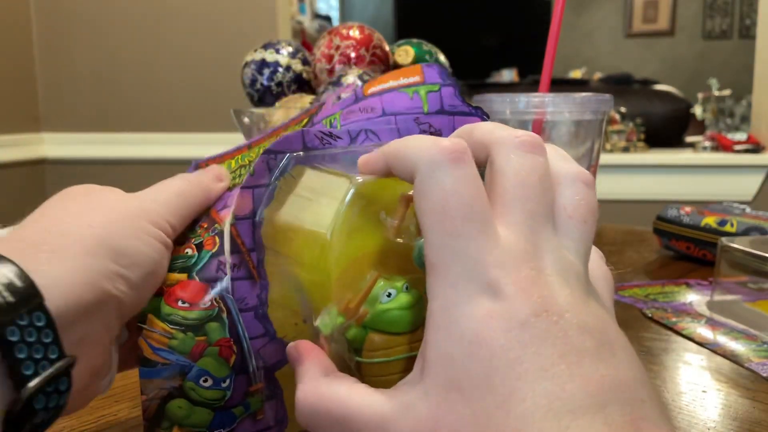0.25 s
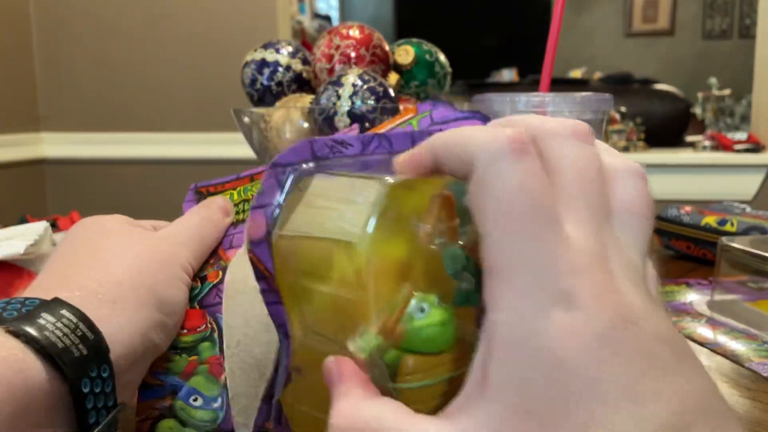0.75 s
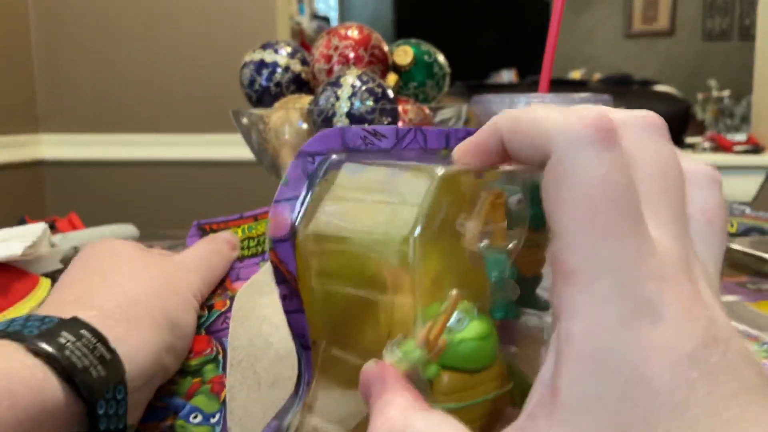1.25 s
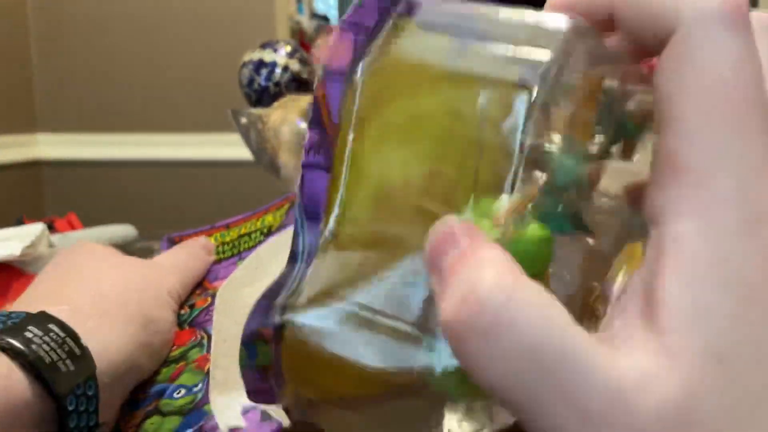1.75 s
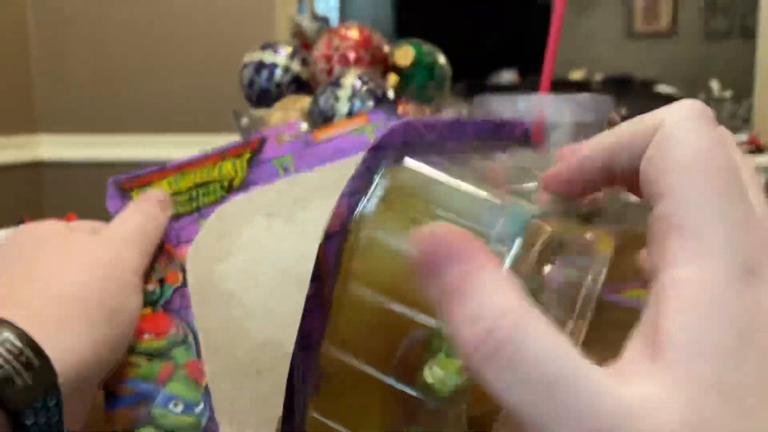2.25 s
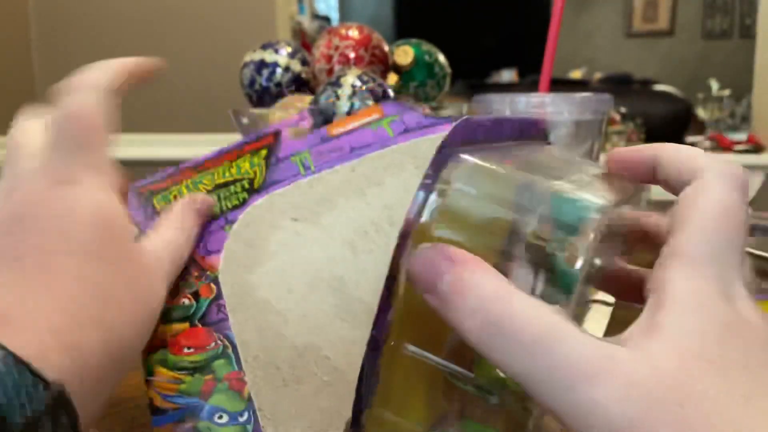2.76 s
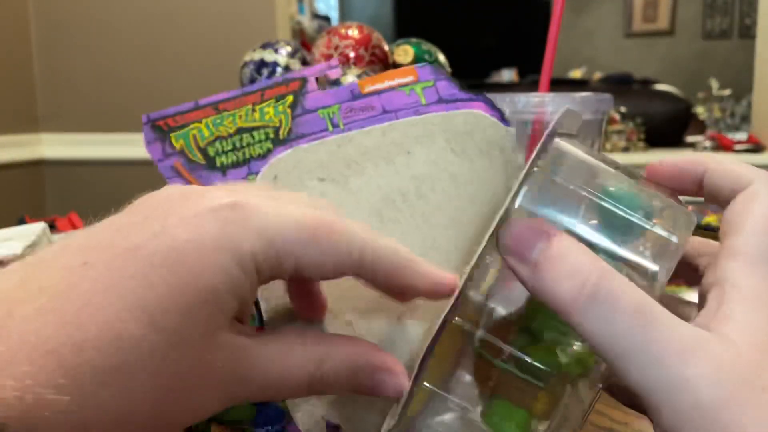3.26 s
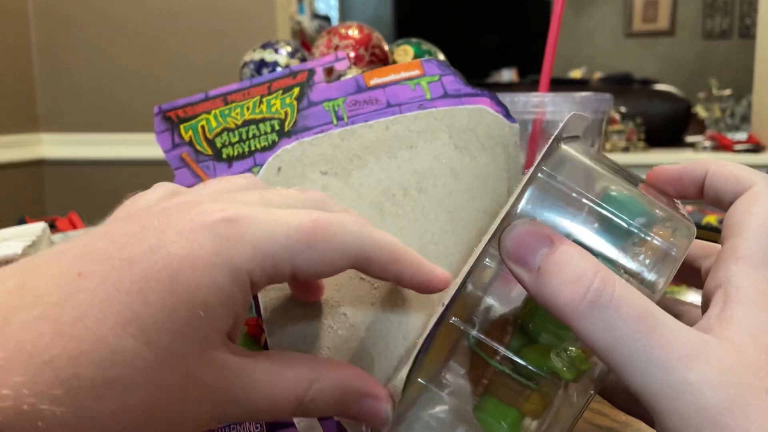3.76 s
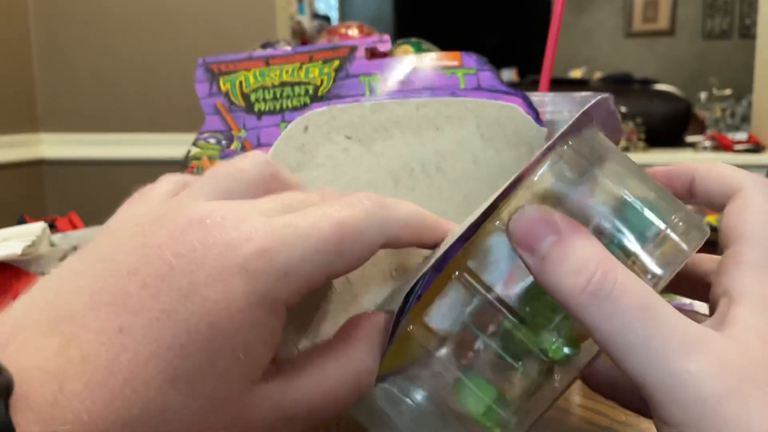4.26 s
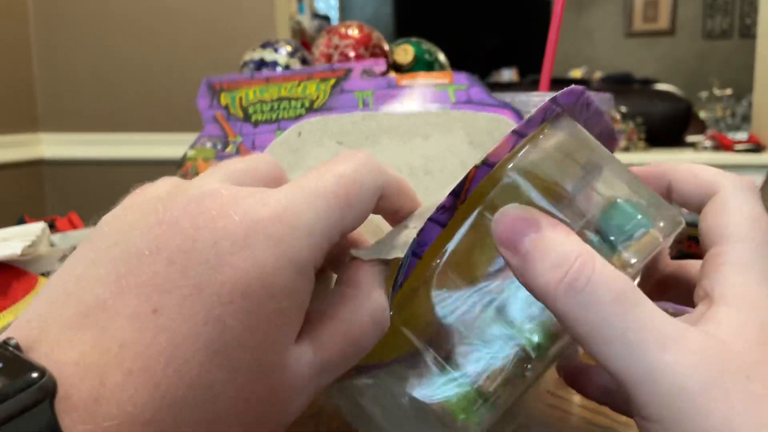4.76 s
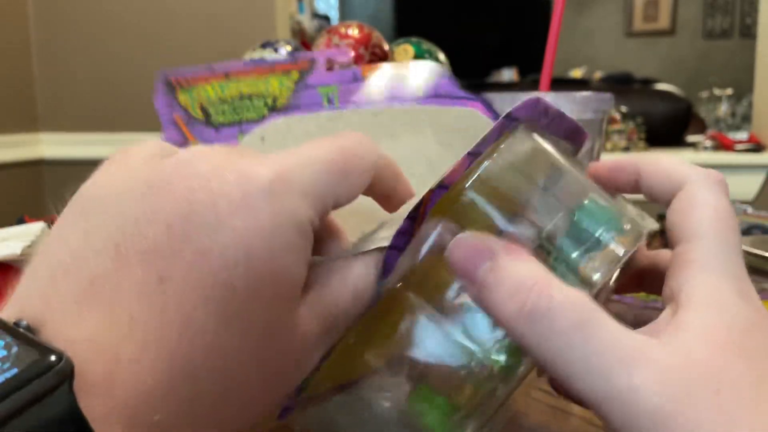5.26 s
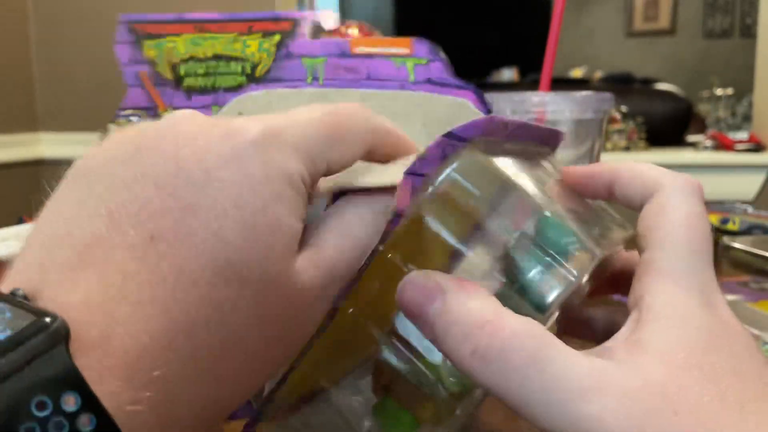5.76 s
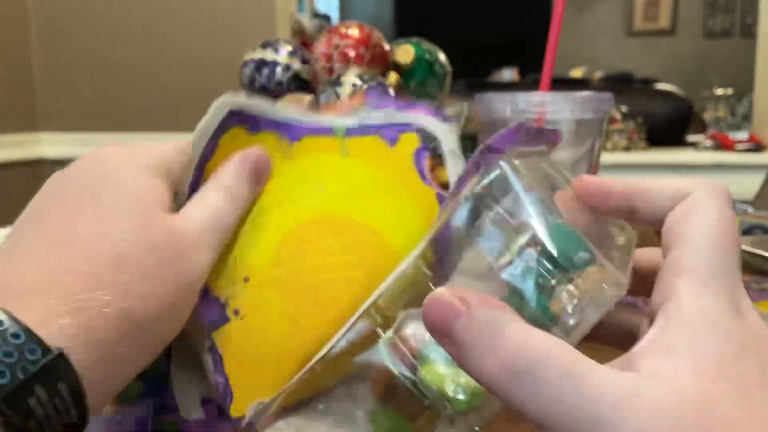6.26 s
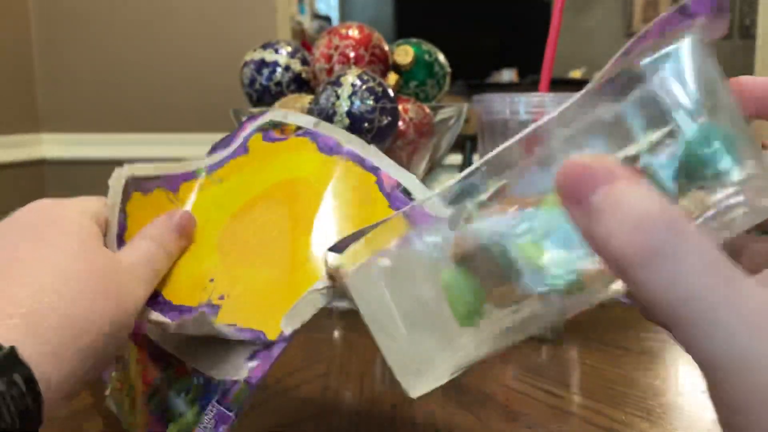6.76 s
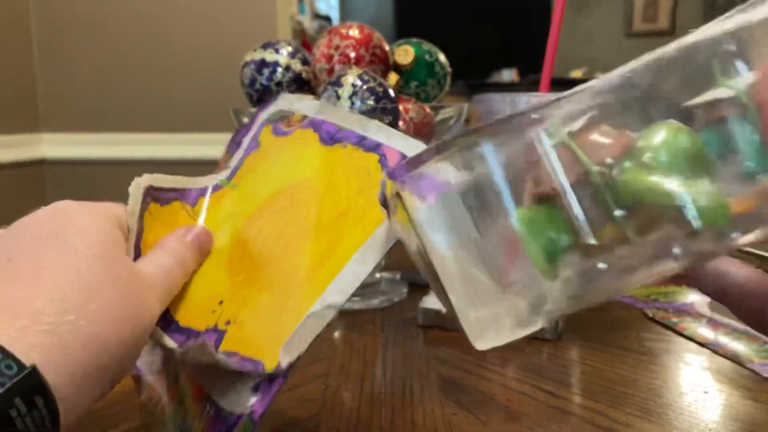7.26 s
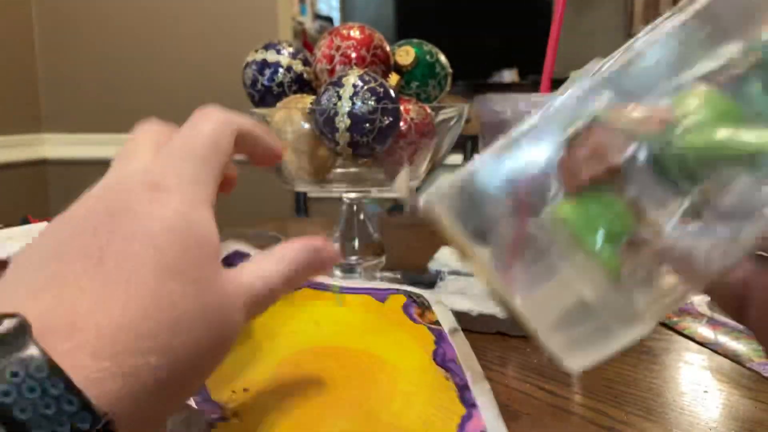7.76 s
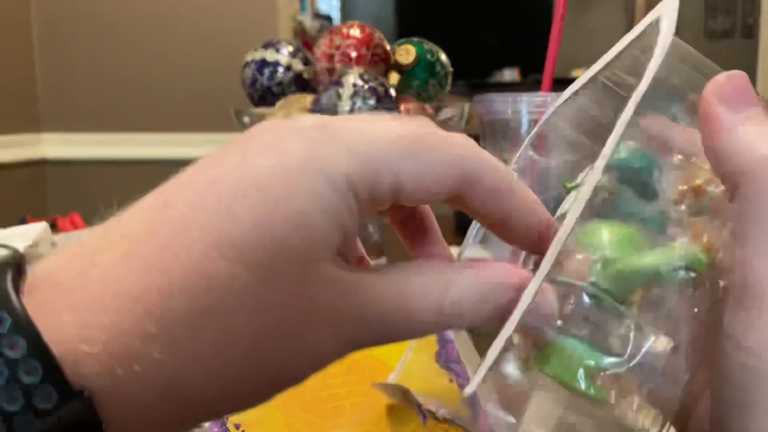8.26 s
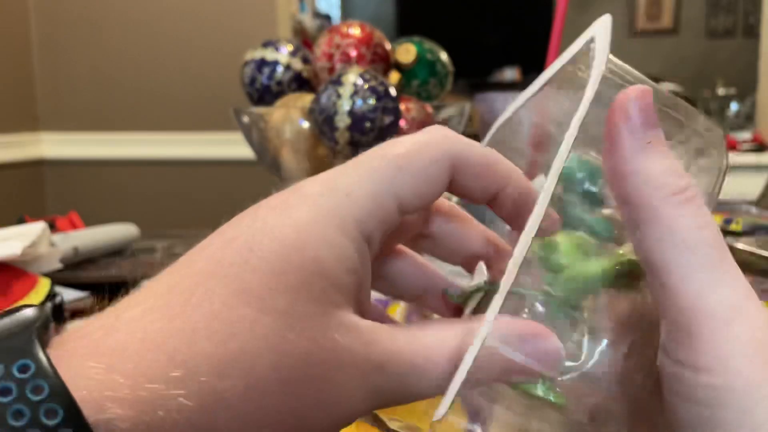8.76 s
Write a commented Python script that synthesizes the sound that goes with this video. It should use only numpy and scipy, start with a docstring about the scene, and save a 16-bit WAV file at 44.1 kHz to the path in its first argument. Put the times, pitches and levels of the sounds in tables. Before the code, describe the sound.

Close-up toy package opening: hollow plastic creases pop sharply, rustle and rip from their cardboard, then nearly fall silent before light crackles.

```python
"""Creases snap in a clear plastic shell as hands peel it off its card backing and bend it, close to a phone.
Each snap rings sine modes of the hollow shell, with a noise thud below and a crack and tick above.
Flexes raise bursts of rustle, grainy noise through ringing modes, over the steady tearing of glue and paper.
The card thuds, a low tone hums once, and a quiet room adds faint air and a short tail.
Layer levels are set ahead of the room, the stereo balance and the phone's own gain."""
import sys
import numpy as np
from scipy import signal
from scipy.fft import rfft, irfft, next_fast_len
from scipy.io import wavfile

SR = 44100
rng = np.random.default_rng(int(sys.argv[2]) if len(sys.argv) > 2 else 0)


def dump(signal):
    """Clip the signal to [-1, 1] and save it as 16-bit WAV at the path in sys.argv[1]."""
    limited = np.clip(np.atleast_2d(signal).T, -1, 1)
    pcm = np.round(limited * 32767).astype(np.int16)
    wavfile.write(sys.argv[1], SR, pcm)


N = 397782
T = np.arange(N) / SR
SPLIT_HZ = 1300  # shell modes below sound hollow, those above sound bright


def undb(db):
    """Decibels to amplitude."""
    return 10 ** (np.asarray(db) / 20)


def unit(x):
    """Scale to rms 1."""
    return x / np.sqrt(np.mean(x ** 2))


def across(table, size, column=1):
    """A table column read on a log-frequency axis at every bin."""
    rows = np.array(table)
    bins = np.log(np.fft.rfftfreq(size, 1 / SR) + 1)
    return np.interp(bins, np.log(rows[:, 0]), rows[:, column])


def colour(x, table):
    """Filter the last axis by a curve of f/Hz, level/dB points."""
    size = next_fast_len(x.shape[-1])
    return irfft(rfft(x, size) * undb(across(table, size)), size)[..., :x.shape[-1]]


def ring(x, hz, t60):
    """One damped mode driven by x, as a two-pole resonator."""
    p = np.exp(-np.log(1000) / (t60 * SR))
    w = 2 * np.pi * hz / SR
    return signal.lfilter([np.sin(w)], [1, -2 * p * np.cos(w), p * p], x)


# stereo image of the two channels by frequency: [f/Hz, likeness 0-1, left minus right level/dB]
STEREO_IMAGE = [(60, 0.91, -2.5), (298, 0.94, -0.8), (700, 0.8, -4), (1290, 0.6, -1), (2797, 0.5, -3),
                (4710, 0.48, -5), (5800, 0.2, -4), (7150, 1, -1.5), (14000, 1, 1)]
# phase turn of the right channel by frequency: [f/Hz, turn/half turns]
RIGHT_TURN = [(0, 0), (600, .13), (1600, .2), (5600, .1), (7000, -.92), (8700, -1.05), (10600, -1.95),
              (12200, -2.05), (13900, -2.96), (15500, -3.05), (17000, -3.2)]
# stereo balance over time, on top of the image's own: [t/s, left minus right level/dB]
BALANCE = [(0, 1), (4.5, -0.45), (6, 0.6), (9.02, -1)]


def stereo(shared, other):
    """Shared sound enters both channels alike; the other part, added with opposite sign, widens the image."""
    size = next_fast_len(N)
    like = np.clip(across(STEREO_IMAGE, size), 0, 1)
    shared = rfft(shared, size) * np.sqrt((1 + like) / 2)
    other = rfft(other, size) * np.sqrt((1 - like) / 2)
    pan = undb(across(STEREO_IMAGE, size, column=2) / 2)
    half_turns = np.interp(np.fft.rfftfreq(size, 1 / SR), *np.transpose(RIGHT_TURN))
    left = (shared + other) * pan
    right = (shared - other) * np.exp(1j * np.pi * half_turns) / pan
    channels = irfft(np.array([left, right]), size)[:, :N]
    balance_db = np.interp(T, *np.transpose(BALANCE))
    return channels * undb(balance_db * np.array([[.5], [-.5]]))


# colour of the quiet air, heavy in the bass: [f/Hz, level/dB]
AIR_COLOUR = [(30, -1.5), (90, -1), (200, -12.5), (600, -21.5), (3000, -34.5), (16000, -48)]
AIR_DB = -62


def air():
    """Steady noise of the quiet room, weighted to the bass."""
    return undb(AIR_DB) * unit(colour(rng.standard_normal(N), AIR_COLOUR))


# colour of the room tail, thin in the bass: [f/Hz, level/dB]
TAIL_COLOUR = [(100, -21), (400, 0), (16000, -3.5)]
ROOM_T60_S, ROOM_DB = 0.16, -14


def room(x):
    """Table and walls add a short diffuse tail, as decaying noise convolved with the sound."""
    t = np.arange(SR // 2) / SR
    tail = colour(rng.standard_normal(len(t)), TAIL_COLOUR)
    tail = tail * np.exp(-np.log(1000) * t / ROOM_T60_S) * (t > .003)
    tail = tail / np.sqrt(np.sum(tail ** 2))
    return x + undb(ROOM_DB) * signal.fftconvolve(x, tail)[:N]


# a low hum, perhaps the card slipping under a finger: [t/s, f/Hz, level/dB rms]
HUM_GLIDE = [(3.28, 130, -54), (3.456, 142, -43.5), (3.64, 140.5, -53.5)]


def hum():
    """A short, low, near-pure tone that glides slightly in pitch."""
    s, hz, db = np.transpose(HUM_GLIDE)
    level = np.sqrt(2) * undb(np.interp(T, s, db, -120, -120))
    return level * np.sin(2 * np.pi * np.cumsum(np.interp(T, s, hz)) / SR)


# gain on the deepest rumble of the card: [t/s, level/dB]
RUMBLE_GAIN = [(0, -14), (1.3, -7), (2.75, 6.5), (3.2, -13), (4.3, -5), (6.8, -1.5), (7.3, 4.5), (9.02, 6)]


def rumble(x):
    """The deepest part of the card's thud comes and goes, by a moving gain on the lowest band."""
    lowpass = signal.butter(2, 105., fs=SR, output="sos")
    deep = signal.sosfiltfilt(lowpass, x)
    return x + deep * (undb(np.interp(T, *np.transpose(RUMBLE_GAIN))) - 1)


# dull colour of the card's thud: [f/Hz, level/dB]
THUD_COLOUR = [(30, -11), (70, 4.5), (150, 6), (220, -1), (350, -44)]


def card_thud(noise):
    """The card's body answers a knock with low noise."""
    return colour(noise, THUD_COLOUR)


# airy colour of tearing glue and paper, and of the snaps' ticks: [f/Hz, level/dB]
TEARING_COLOUR = [(1800, -3.5), (4800, 1), (7400, 6.5), (8800, 5.5), (11000, 2.5), (13000, -4),
                  (15200, 6.5), (16500, -17)]


def tearing(noise):
    """Parting fibres rasp as treble noise."""
    return colour(noise, TEARING_COLOUR)


# colour of the crackle when it is fine: [f/Hz, level/dB]
FINE_CRACKLE = [(800, -21), (1300, 1), (2000, -2), (3000, -0.5), (4500, -5.5), (6000, -8.5), (7000, -30.5)]
# colour of the crackle when it is coarse: [f/Hz, level/dB]
COARSE_CRACKLE = [(800, -13), (1300, 2.5), (2500, -16), (4500, -26.5), (7000, -51.5)]


def crackling(noise, treble_db):
    """The louder the treble against the crackle, the brighter the crackle itself."""
    bright = np.clip(2.0 + treble_db / 9.94, 0, 1)
    fine = np.sqrt(bright) * unit(colour(noise, FINE_CRACKLE))
    coarse = np.sqrt(1 - bright) * unit(colour(noise, COARSE_CRACKLE))
    return fine + coarse


def grains(per_s, spread_db, tail_s, smooth):
    """Envelope of many small uneven slips, each swelling and dying quickly, over an even rub; rms 1."""
    sizes = undb(spread_db * np.minimum(rng.exponential(size=N), 4))
    kicks = (rng.random(N) < per_s / SR) * sizes
    p = np.exp(-1 / (tail_s * SR))
    slips = unit(signal.lfilter([1], [1, -2 * p, p * p], kicks))
    return unit(smooth + slips)


def patchy(per_s, spread_db):
    """A randomly wandering gain that makes one mode's ringing uneven."""
    steps = np.clip(rng.standard_normal(int(N / SR * per_s) + 2), -3, 1.4)
    return undb(spread_db * np.interp(T * per_s, np.arange(len(steps)), steps))


# steady pull of the hands: [t/s, shell rustle level/dB, card thud level/dB, crackle level/dB,
# fine tearing level/dB]
STEADY_PULL = [(0, -44.5, -51, -50.5, -51.5), (0.35, -38.5, -60, -45, -41.5), (1.25, -46, -48, -65, -46.5),
               (1.7, -41.5, -45, -46, -44), (1.85, -49.5, -46, -58.5, -59.5),
               (2.4, -51.5, -49, -70.5, -72.5), (2.95, -53, -63, -71.5, -71.5),
               (3.549, -62, -51.5, -73.5, -88), (4.15, -51.5, -75, -60, -61.5),
               (4.93, -61, -67, -72, -88.5), (5.33, -55.5, -65, -59.5, -51),
               (6.55, -59.5, -59.5, -54, -70.5), (7.2, -61.5, -66, -64, -63.5), (7.5, -54, -62, -62, -67),
               (7.8, -80, -74, -64.5, -69.5), (8.0, -86, -71, -85, -97), (8.5, -77, -75, -79, -80),
               (9.02, -50, -65, -51.5, -57.5)]
# flexes of the shell: [peak t/s, shell rustle level/dB, card thud level/dB, crackle level/dB,
# fine tearing level/dB, swell t/s, fade t/s]; both times are held within 0.008 to 1 s
SHELL_FLEXES = [(0.159, -37, -61, -36.5, -37.5, 0.02, 0.2), (0.244, -37.5, -54, -38.5, -38.5, 0.08, 0.2),
                (.45, -35.5, -52, -45.5, -40, .008, 0.5), (.716, -23, -37.5, -32.5, -31.5, 0.1, 0.14),
                (.9, -38.5, -54.5, -47.5, -43.5, 0.1, 0.14), (1.109, -35, -44.5, -41, -34.5, 0.2, 0.09),
                (1.327, -51.5, -60, -54, -39.5, .08, -0.27), (1.438, -33.5, -65, -36.5, -31, 0.06, 0.05),
                (1.638, -34, -57, -38.5, -42, 0.54, 0.04), (1.732, -28, -40, -42, -31.5, 0.03, 0),
                (1.956, -40, -29.5, -58, -62.5, 0.08, 0.16), (2.003, -31, -30.5, -40.5, -56.5, 0.05, 0.14),
                (2.161, -31, -31, -49, -58, .01, .2), (2.538, -39, -41, -52, -63, .009, 0.2),
                (2.693, -38, -57, -45.5, -55, 0.16, 0.13), (2.786, -39, -36.5, -69, -64, .008, .008),
                (2.824, -44, -61, -43, -58.5, 0.01, 0.12), (3.02, -37, -38, -55, -60, 0.04, 0.06),
                (3.069, -32.5, -61, -46.5, -50, 0.1, 0.24), (3.344, -41, -43.5, -57.5, -62, -0.47, 0.12),
                (3.476, -37, -58, -46, -53, 0.06, 0.05), (3.733, -39, -48, -54, -64, .009, 0.25),
                (3.905, -28.5, -50, -47.5, -51.5, 0.12, 0.12),
                (4.051, -39.5, -45.5, -49.5, -50, 0.06, 0.08), (4.225, -49, -66, -49.5, -58, 0.1, -0.1),
                (4.292, -43.5, -51, -57.5, -46, 0.07, -0.85), (4.452, -39.5, -44, -52.5, -50, 0.24, 0.24),
                (4.6, -45, -38, -61, -53, -0.1, -0.34), (4.695, -34, -50, -39, -42, 0.15, 0.14),
                (4.816, -34, -46, -46.5, -47, .008, 0.12), (5.068, -37.5, -45, -44.5, -41, 0.15, 0.1),
                (5.251, -32.5, -40.5, -45.5, -49, 0.04, 0.07), (5.439, -28, -60, -36, -34.5, 0.09, 0.08),
                (5.572, -41, -45.5, -43, -61, 0.4, 0.07), (5.65, -39, -50, -52, -56, 0.2, -0.1),
                (5.76, -32.5, -46.5, -47.5, -47, 0.07, 0.4), (5.89, -39, -44, -47, -46, 0.14, 1),
                (5.988, -18.5, -34, -29, -30, 0.04, 0.14), (6.158, -23, -33, -28.5, -31.5, -0.04, 0.1),
                (6.247, -29, -45, -32, -34.5, -0.02, 0.11), (6.42, -30.5, -37, -34, -39, 0.19, 0.14),
                (6.626, -41.5, -62, -37.5, -35.5, -0.01, 0.1),
                (6.681, -37, -46.5, -36.5, -34.5, 0.09, .008), (6.78, -36, -49, -32, -41, 0.05, 0.21),
                (6.95, -31.5, -49, -24, -34, 0.02, 0.107), (7.137, -47, -56.5, -49.5, -53, 1, 0.6),
                (7.333, -21.5, -29, -30.5, -42, 0.0248, 0.0944), (7.544, -58, -55, -48, -59.5, 0.2, 0.24),
                (7.634, -43.5, -46, -64.5, -62.5, -0.14, 0.04), (7.932, -62, -65, -76, -79.5, 0.2, -0.2),
                (8.06, -64.5, -69.5, -59.5, -64, -0.04, 0.5), (8.2, -63, -65, -59.5, -61, 0.06, 0.2),
                (8.371, -63, -63, -52.5, -57.5, -0.03, 0.1), (8.545, -57, -56, -56.5, -66, -0.2, 0.3),
                (8.679, -52.5, -62, -56.5, -64, -0.1, 3.5), (8.81, -55, -49, -61, -60, -0.1, -0.1),
                (8.881, -42, -74.5, -35, -36, 0.0444, 0.04)]
FADE_DB = 20  # change over one swell or fade time


def handling(size=4000):
    """Levels in dB of the four rustle layers: steady pull plus every flex, summed as power."""
    t = np.linspace(0, N / SR, size)
    s, *columns = np.transpose(STEADY_PULL)
    pull = undb([np.interp(t, s, c) for c in columns])
    rows = np.array(SHELL_FLEXES)
    late = t - rows[:, :1]
    swell_s, fade_s = np.clip(rows[:, -2:], .008, 1).T[:, :, None]
    shape = undb(FADE_DB * np.minimum(late / swell_s, -late / fade_s))
    power = pull ** 2 + undb(rows[:, 1:-2].T) ** 2 @ shape ** 2
    return [np.interp(T, t, 10 * np.log10(p)) for p in power]


# modes of the shell, for rustle and snaps alike: [f/Hz, relative level/dB]
SHELL_MODES = [(250, -1), (330, -3.5), (400, 1), (500, -3.5), (620, 0), (720, 2.5), (810, -1), (900, 2.5),
               (1030, -0.5), (1180, -19), (1450, -18), (1750, -6.5), (2050, -6.5), (2430, -17), (2970, -15),
               (3600, -20), (4300, -17), (4900, -16), (5800, -19.5)]


def rustle(slow, quick):
    """Small slips shake the shell's modes and the card; tearing fibres rasp above them."""
    shell_db, thud_db, crackle_db, tearing_db = handling()
    noise = rng.standard_normal((4, N))
    rasp = (quick + .5 * slow) * noise[2]
    hollow = bright = 0
    for hz, db in SHELL_MODES:
        if hz < SPLIT_HZ:
            tilt_db = -0.63 * np.log2(hz / 500)
            hollow = hollow + undb(db + tilt_db) * ring(slow * patchy(30., 4.8) * noise[0], hz, 0.022)
        else:
            bright = bright + undb(db) * ring(rasp * patchy(22., 26.0), hz, 0.13)
    crackle = unit(crackling(rasp, tearing_db - crackle_db) + 0.55 * unit(bright))
    thud = unit(card_thud(slow * noise[1]))
    fibres = unit(tearing((quick + 0.4 * slow) * noise[3]))
    return (undb(shell_db) * unit(hollow) + undb(thud_db) * thud
            + undb(crackle_db) * crackle + undb(tearing_db) * fibres)


# creases snapping, each layer at its peak level: [peak t/s, shell level/dB, shell f/Hz, thud level/dB,
# crack level/dB, crack f/Hz, tick level/dB, softness/ms (sets ramp and ring)]
CREASE_SNAPS = [(0.083, -27, 416, -62, -30.5, 1840, -41, 2.4),
                (0.108, -36, 710, -56, -25, 2500, -34.5, 0.67),
                (0.152, -23.5, 570, -52, -24, 1970, -43, 1.4), (.239, -6.5, 470, -48, -10, 2540, -36, 1.8),
                (0.44, -15, 587, -31, -19.5, 1970, -21, 0.59),
                (0.455, -16, 904, -35.5, -18, 1965, -38.5, 1.8),
                (0.505, -11.5, 860, -37, -14, 1970, -25.5, 1.2),
                (0.654, -23.5, 392, -44, -35, 5340, -40.5, 2.4),
                (0.701, -16, 755, -34, -17, 1440, -25, 2.4), (.718, -3, 718, -13.5, -5.5, 1467, -17.5, 3.3),
                (.787, -29, 700, -48, -26.5, 2060, -38, 3), (.849, -24, 786, -54, -27, 1370, -37.5, 3.8),
                (1.004, -30, 750, -44, -15.5, 2050, -30.5, 0.91),
                (1.016, -30, 720, -51.5, -27, 5300, -23, 0.49),
                (1.223, -32, 980, -66, -26.5, 2020, -53, 0.82), (1.425, -25, 694, -55, -39, 3030, -24.5, 2),
                (1.45, -7, 564, -51, -21, 1340, -27, 1.4), (1.585, -13, 790, -50, -14, 3400, -31, 1.9),
                (1.656, -23.5, 800, -46, -21, 1600, -29.5, 1.3), (1.82, -25, 611, -34, -54, 1395, -55, 5.3),
                (1.891, -34.5, 717, -41, -50.5, 4900, -22.5, 1.2),
                (1.935, -32.5, 672, -40, -35, 1510, -39.5, 2.8), (1.997, 3, 563, -5, -12, 2976, -23, 4.2),
                (2.06, -28, 700, -35, -28, 1374, -28.5, 1.9), (2.159, -6, 394, -21.5, -23, 2740, -26, 3.2),
                (2.241, -23.5, 460, -43, -34, 1300, -42, 0.89), (2.312, -29, 600, -35, -60, 1530, -71, 11),
                (2.539, -23.5, 350, -31, -42, 1400, -49, 4),
                (2.548, -27.5, 340, -27.5, -23, 2840, -38.5, 1.9),
                (2.648, -29, 565, -51, -43, 1370, -62, 2.5),
                (2.706, -21.5, 536, -32, -28.5, 1890, -30, 4.8),
                (2.816, -29.5, 1150, -47, -30.5, 1790, -45, 4.9),
                (2.833, -23.5, 610, -56, -25, 1770, -36, 4.6), (2.85, -27, 1170, -57, -32, 1850, -49, 5.2),
                (2.895, -20.5, 560, -40, -30, 1950, -43.5, 3.5),
                (3.015, -14, 645, -37, -39, 1360, -40, 0.9), (3.064, -20.5, 740, -52, -29.5, 1390, -46, 13),
                (3.097, -27.5, 815, -52.5, -36, 2750, -48, 4.1),
                (3.124, -32, 784, -50, -48, 1700, -44, 0.85), (3.179, -27, 795, -61, -44, 1700, -51, 1.6),
                (3.45, -23, 612, -48, -48, 3200, -44, 5.9), (3.495, -27.5, 390, -60, -40.5, 1500, -45, 4.6),
                (3.619, -28, 730, -48, -41.5, 1320, -49.5, 5.2),
                (3.728, -7.5, 727, -31.5, -23.5, 1720, -24.5, 1.57),
                (3.888, -19, 668, -42, -46, 1330, -34.5, 4.8), (3.909, -8, 500, -17, -28, 1670, -28.5, 9.6),
                (3.926, -24.5, 380, -32, -29.5, 5400, -17.5, 0.82),
                (4.194, -37.5, 675, -58, -42, 1630, -32.5, 1.2),
                (4.217, -31, 800, -54, -46, 3120, -32, 0.57),
                (4.235, -26.5, 830, -58, -42, 2500, -31.5, 2.5),
                (4.287, -14.5, 710, -35, -49, 1300, -36, 1.45), (4.355, -34, 700, -56, -40, 4500, -29, 1),
                (4.392, -26.5, 520, -54, -29, 2570, -22, 5.1),
                (4.447, -11, 525, -45, -21, 1256, -55.5, 2.7),
                (4.588, -29, 846, -49.5, -31, 3220, -28.5, 4), (4.627, -30, 453, -45, -54, 1400, -52, 2.7),
                (4.642, -27, 543, -35, -26, 3270, -22.5, 0.87), (4.676, -25, 456, -43, -27.5, 4520, -29, 4),
                (4.704, -9, 627, -51, -20, 1370, -30.5, 2), (4.821, -24, 450, -31.5, -34.5, 1440, -40, 1.4),
                (5.046, -31.5, 740, -36.5, -30, 3800, -27.5, 3.9),
                (5.091, -26.5, 384, -40, -38, 2110, -46, 13), (5.186, -33, 560, -60, -44, 1600, -52, 4),
                (5.238, -29.5, 765, -39, -40, 1510, -50, 1.4), (5.38, -34, 575, -59, -26.5, 1450, -39, 1.2),
                (5.427, -15.5, 593, -28, -21.5, 1590, -16, 6), (5.454, -14, 790, -32, -20, 3600, -24, 4.4),
                (5.473, -20, 895, -45, -13, 1530, -11.5, 0.81),
                (5.525, -24, 850, -56.5, -26.5, 2300, -21, 2.1), (5.565, -34, 841, -58, -32, 1460, -54, 18),
                (5.608, -26, 626, -34, -37, 3150, -37, 1.6), (5.66, -27.5, 480, -48, -38, 1750, -47, 2.4),
                (5.7, -36.5, 800, -54, -38, 1900, -42, 1.6), (5.75, -19.5, 675, -39, -34, 1992, -23.5, 2.7),
                (5.76, -23.5, 301, -17, -30, 1500, -45, 5), (5.816, -12.5, 415, -28, -22, 1260, -47, 2),
                (5.852, -29.5, 700, -59, -39, 1400, -45, 1.5),
                (5.889, -11, 543, -10, -25, 1314, -30.5, 1.7),
                (5.956, -25.5, 338, -30.5, -28.5, 2610, -26.5, 2.3),
                (5.981, -3, 418, -14.5, -16, 1445, -22.5, 3.5),
                (5.993, -0.5, 427, -21, -13, 1446, -22.5, 2.5),
                (6.007, -6.5, 571, -29.5, -12.5, 1465, -29, 3.7),
                (6.032, -14, 724, -24, -22.5, 1450, -15.5, 1.4),
                (6.072, -24.5, 553, -41.5, -23.5, 1604, -23, 5.7),
                (6.151, -5, 698, -18.5, -8.5, 2623, -13, 5),
                (6.172, -11.5, 717, -16.5, -15, 1580, -15.5, 6.2),
                (6.23, -20, 747, -47, -18.5, 2920, -16, 4), (6.253, -11.5, 765, -34, -16.5, 1650, -15, 7.1),
                (6.352, -28.5, 700, -56, -30.5, 5200, -25, 1),
                (6.41, -17.5, 680, -46, -18.5, 1440, -23, 4.7),
                (6.601, -38.5, 1100, -58.5, -34.5, 1400, -46, 1.5),
                (6.623, -33, 1000, -57.5, -21.5, 2930, -41.5, 2.5),
                (6.672, -47.5, 510, -57, -31, 3470, -34, 1.5), (6.684, -24.5, 585, -33, -28, 1570, -33, 5),
                (6.775, -11.5, 803, -34, -4.5, 2420, -10, 2.4),
                (6.943, -9.5, 607, -32.5, -3, 3010, -5.5, 1.2),
                (6.956, -29, 1130, -26.5, -10.5, 1620, -16.5, 0.37),
                (7.256, -34.5, 1015, -42.5, -22, 3000, -29.5, 2.8),
                (7.329, -13, 600, -30.5, -6, 2990, -11, 2.2),
                (7.339, -13.5, 426, -19.5, -9.5, 1655, -22.5, 6.1),
                (7.411, -23.5, 604, -38.5, -33, 1560, -46, 7.8),
                (7.447, -30, 660, -40, -38, 1520, -51, 6.6), (7.539, -45, 800, -52, -34, 1900, -44, 2.7),
                (7.602, -30, 440, -59, -39, 1820, -64, 0.59), (7.612, -36, 297, -34, -57, 1500, -65, 5),
                (7.633, -35, 700, -34, -28, 2370, -45, 1.9),
                (7.703, -36.5, 365, -58, -32.5, 3360, -39, 1.2),
                (7.822, -46.5, 900, -55, -49, 1490, -54, 1.9),
                (7.936, -55, 800, -60, -51.5, 1500, -63, 1.3), (8.13, -42, 440, -69, -53.5, 3280, -62, 6.7),
                (8.16, -43.5, 506, -67, -51, 3240, -62, 38),
                (8.539, -51, 1080, -68.5, -29.5, 4360, -34, 1.4),
                (8.558, -55, 905, -51, -35.5, 1510, -54.5, 2.2),
                (8.623, -44, 700, -50, -43, 1980, -46, 3.9), (8.674, -35.5, 1130, -46, -38, 1500, -49, 2.2),
                (8.682, -42, 980, -53, -32, 3150, -25, 1.1), (8.808, -36, 1060, -48, -42, 1790, -57, 2.1),
                (8.83, -46, 990, -62, -34, 6040, -32, 1.53), (8.848, -53, 910, -58, -23, 5760, -18, 0.93),
                (8.869, -41, 1095, -63, -33, 2400, -23, 2.9),
                (8.887, -32, 1050, -64, -15.5, 2260, -20, 0.84),
                (8.906, -33, 1030, -64, -24, 3360, -41, 2.8)]
RING_S, RING_PER_RISE = 0.022, 3.1  # base t60, and s added per s of softness: softer snaps ring longer
SAG_PER_S = 4.63  # share by which the mean pitch since the peak falls, per s, for the first 20 ms
LATE_S_PER_OCTAVE, THUD_LATE_S = .005, .006  # low bending waves travel slowly and arrive late


def snaps(size=3072, lead=1024):
    """Each snap rings the shell modes near its two pitches, with a thud below and a short tick above."""
    s, peak_db, hz, thud_db, crack_db, crack_hz, tick_db, rise_ms = np.transpose(CREASE_SNAPS)[:, :, None]
    rise = rise_ms / 1000
    ramp_s = np.clip(2.27 * rise, .0004, .03)
    t60 = np.clip(RING_S + RING_PER_RISE * rise, .01, .15)
    t = (np.arange(size) - lead) / SR

    def rising(t):
        """Log of a ramp up to the peak."""
        return np.log(np.clip(1 + t / ramp_s, 1e-6, 1))

    def falling(t):
        """Log of the decay after the peak."""
        return -np.maximum(t, 0) * np.log(1000) / t60

    swell, fade = rising(t), falling(t)
    chance = rng.random((len(CREASE_SNAPS), len(SHELL_MODES), 3))
    noise = rng.standard_normal((len(CREASE_SNAPS), 3, size))
    turns = rng.random((len(CREASE_SNAPS), 2))
    sag = t - SAG_PER_S * np.clip(t, 0, .02) * t  # the shell slackens, so its pitch falls

    # the panel beside the crease rings loudest
    hollow = 1.33 * np.sin(2 * np.pi * (hz * sag + turns[:, :1])) * np.exp(2.54 * swell + fade)
    bright = 1.02 * np.sin(2 * np.pi * (crack_hz * sag + turns[:, 1:]))
    for k, (mode_hz, db) in enumerate(SHELL_MODES):
        bent = mode_hz * (1 + 0.19 * (chance[:, k, 1:2] - .5))  # each mode is detuned at random in every snap
        mode = undb(-8. * chance[:, k, :1]) * np.sin(2 * np.pi * (bent * sag + chance[:, k, 2:]))
        if mode_hz < SPLIT_HZ:
            late = t - LATE_S_PER_OCTAVE * np.maximum(np.log2(hz / mode_hz), 0)
            nearness_db = -5.0 * np.log2(mode_hz / hz) ** 2
            decay = falling(late) * np.sqrt(mode_hz / hz)  # higher modes die first
            hollow = hollow + mode * undb(db + nearness_db) * np.exp(1.44 * rising(late) + decay)
        else:
            bright = bright + mode * undb(-25. * np.log2(mode_hz / crack_hz) ** 2)

    thud_t = t - THUD_LATE_S
    thud = card_thud(noise[:, 0] * np.exp(1.5 * rising(thud_t) + 0.74 * falling(thud_t)))
    # within the crack, the ringing outlasts the noise
    crack = crackling(noise[:, 1], tick_db - crack_db) * np.exp(0.17 * fade) + bright * np.exp(-.3 * fade)
    crack = crack * np.exp(1.1 * swell + 1.63 * fade)
    tick = tearing(noise[:, 2]) * np.exp(0.74 * swell + 4.0 * fade)
    layers = [(hollow, peak_db), (thud, thud_db), (crack, crack_db), (tick, tick_db)]
    sound = sum(x * undb(db) / np.abs(x).max(axis=1, keepdims=True) for x, db in layers)

    out = np.zeros(N + 2 * size)
    for at, one in zip((s[:, 0] * SR).astype(int), sound):
        out[at:at + size] += one
    return out[lead:lead + N]


def scene():
    """Snaps, rustle, air and hum in stereo; a second rendering with fresh noise widens the image."""
    slow = grains(220., 3.2, 0.003, smooth=0.45)
    quick = grains(300.0, 3., 0.0004, smooth=2.)
    # both renderings follow the same grains and handling, with noise and mode phases of their own
    shared, other = (room(rumble(rustle(slow, quick) + snaps())) + air() for _ in range(2))
    return stereo(shared + hum(), other)


LOW_HZ, TOP_HZ = 44, 16100


def record(dry):
    """The phone drops the deep bass, rounds the loudest peaks and cuts the top."""
    highpass = signal.butter(3, LOW_HZ, "high", fs=SR, output="sos")
    thin = signal.sosfilt(highpass, dry)
    rounded = 1.085 * np.tanh(thin / 1.317)
    lowpass = signal.ellip(8, .2, 80, TOP_HZ, fs=SR, output="sos")
    return signal.sosfilt(lowpass, rounded)


dry = scene()
out = record(dry)
dump(out)
```